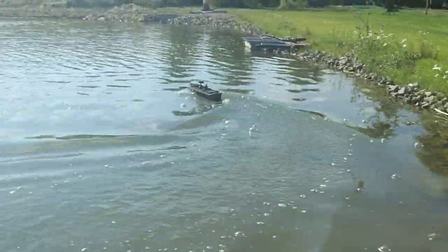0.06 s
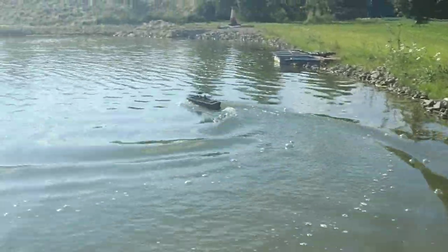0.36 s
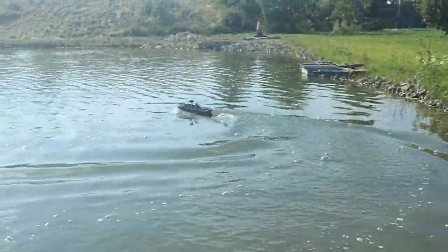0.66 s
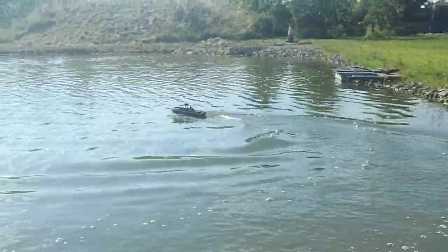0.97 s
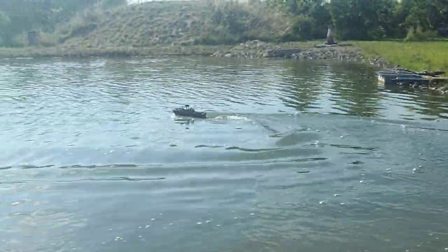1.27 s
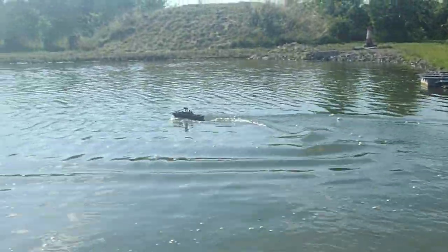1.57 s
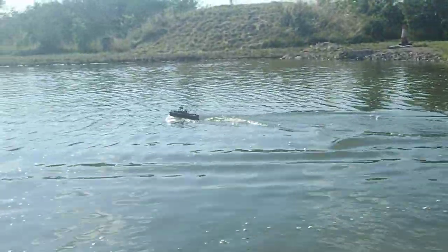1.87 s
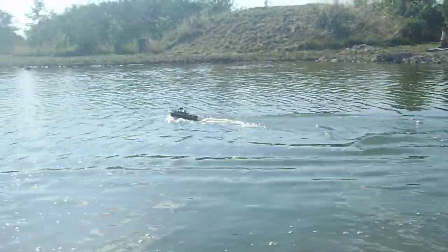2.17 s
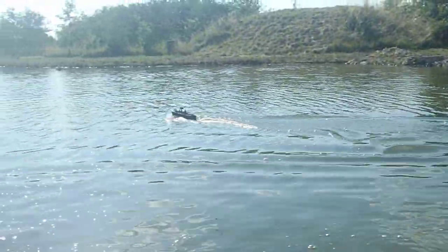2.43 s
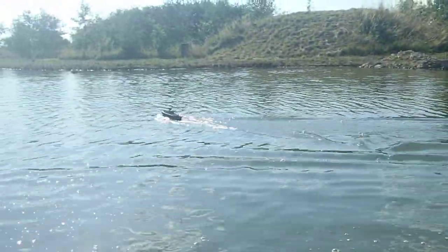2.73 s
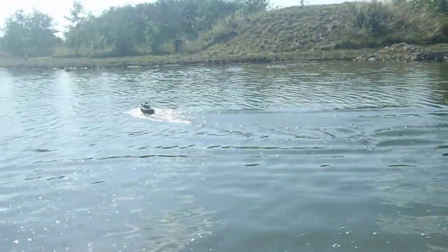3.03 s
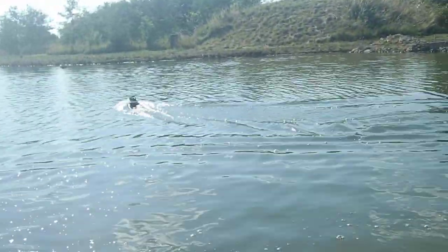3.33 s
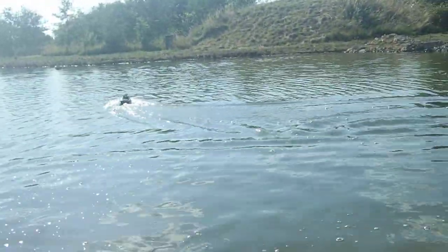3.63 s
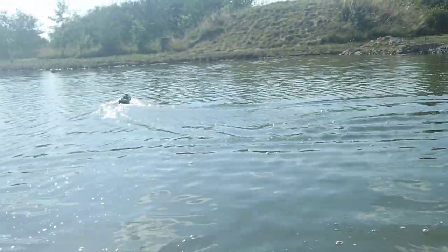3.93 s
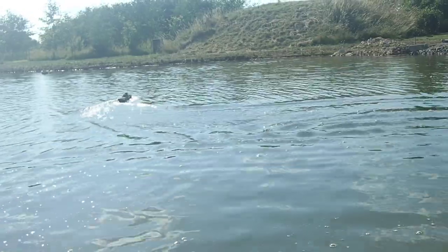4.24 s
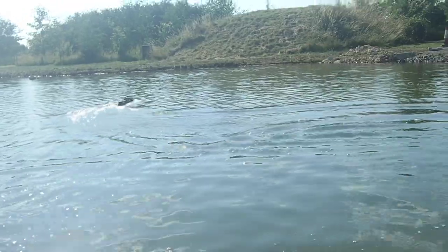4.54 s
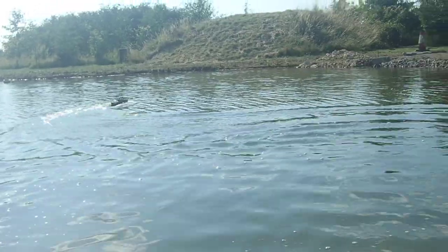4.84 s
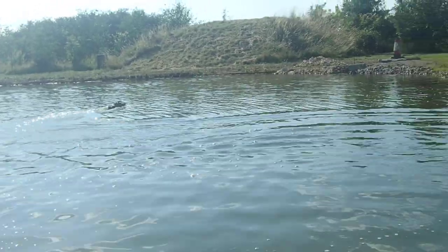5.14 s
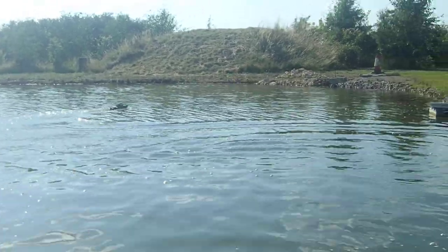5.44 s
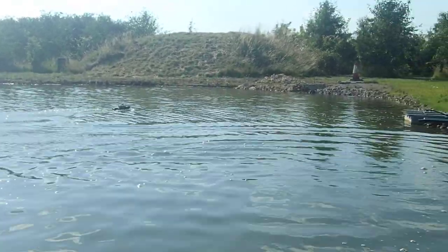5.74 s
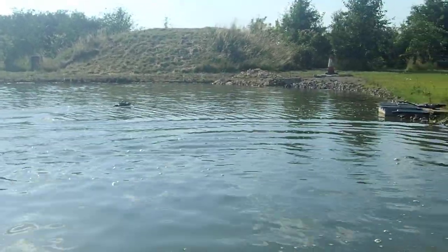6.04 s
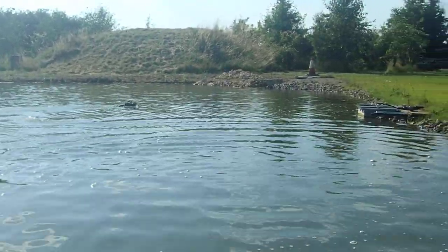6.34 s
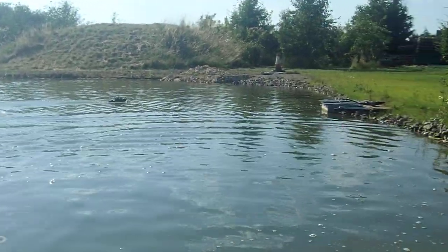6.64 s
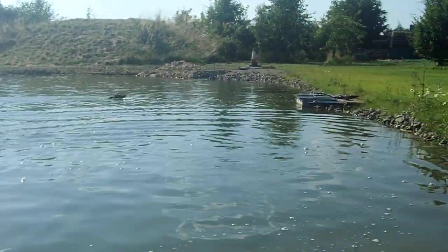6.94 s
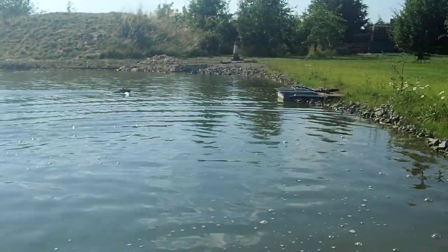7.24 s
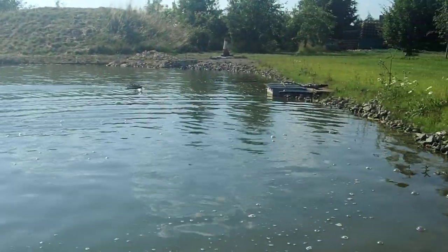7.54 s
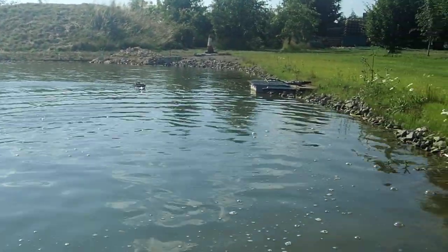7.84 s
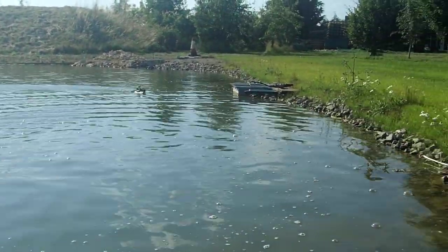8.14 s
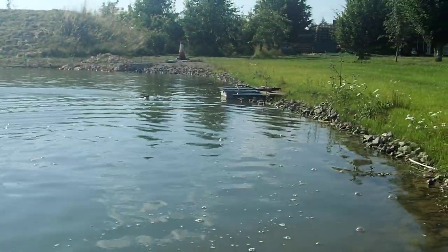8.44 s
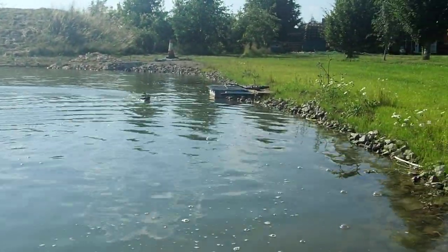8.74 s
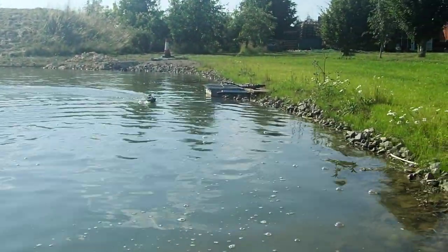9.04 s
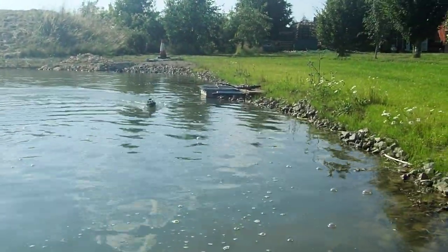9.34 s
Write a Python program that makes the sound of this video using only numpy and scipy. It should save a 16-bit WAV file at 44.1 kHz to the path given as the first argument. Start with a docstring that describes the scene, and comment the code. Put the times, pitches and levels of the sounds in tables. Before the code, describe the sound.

A small electric model boat whines faintly under sizzling spray and gurgling water, while a small bird trills and whistles.

```python
"""A small electric model boat circles on a pond. From the start, over a low outdoor rumble, its motor
whines faintly, bubbles gurgle and spray crackles a little to the right; the camera's microphone ports
ring near 5 kHz and make the spray sizzle. Drops tick and big bubbles plop, with a soft bump at 0.8 s.
A brief high hiss comes just before 2 s, then the first slaps of water. From 5 s a small bird sings a
rising trill and two thin whistles, ending at 8 s while the water splashes on."""
import sys
import numpy as np
from scipy import signal
from scipy.fft import rfft, irfft
from scipy.io import wavfile

SR = 44100
rng = np.random.default_rng(int(sys.argv[2]) if len(sys.argv) > 2 else 0)


def output_pcm(signal):
    """Save a mono or channel-first signal as 16-bit PCM at the path in sys.argv[1].

    Samples are clipped to [-1, 1] before scaling.
    """
    pcm = np.clip(np.atleast_2d(signal).T, -1, 1) * 32767
    wavfile.write(sys.argv[1], SR, np.round(pcm).astype(np.int16))


N = 418940
TIME, BINS = np.arange(N) / SR, np.fft.rfftfreq(N, 1 / SR)


def gain_of(db):
    """Turns decibels into a number to multiply a sound by."""
    return 10 ** (np.asarray(db) / 20)


def evened(x):
    """Scales a signal to an average strength (rms) of 1."""
    return x / np.sqrt(np.mean(x ** 2) + 1e-20)


def spectrum(points):
    """Joins a table's points into a value for every frequency."""
    hz, value = np.transpose(points)
    return np.interp(np.log(BINS + 1), np.log(hz + 1), value)


def follow(rows):
    """Joins a table's points into curves over time, one for each column after the time."""
    times, *columns = np.transpose(rows)
    return [np.interp(TIME, times, column) for column in columns]


def add(mix, start_s, sound):
    """Mixes a sound in at the given time."""
    part = mix[max(round(start_s * SR), 0):][:len(sound)]
    part += sound[:len(part)]


def drift(hz):
    """A smooth random wobble, up to about this fast."""
    return evened(irfft(rfft(rng.standard_normal(N)) / (1 + (BINS / hz) ** 4), N))


def coloured(x, db):
    """Turns each frequency up or down; any ringing comes after a sound, never before it."""
    cepstrum = irfft(np.log(gain_of(db)), N)
    cepstrum[1:N // 2] *= 2
    cepstrum[N // 2 + 1:] = 0
    return irfft(rfft(x) * np.exp(rfft(cepstrum, N)), N)


# how alike the two ports hear the water: (frequency [Hz], likeness [0-1])
PORT_LIKENESS = [(100, 0.45), (900, 0.97), (3400, 1), (4000, 0.8), (5400, 0.99), (6700, 1), (8000, 0.87),
                 (15000, 0.94)]
# which side is louder: (frequency [Hz], left minus right [dB])
PORT_LOUDER_SIDE = [(1000, 1.5), (3300, -1), (4000, -3.5), (4700, -3.5), (5300, -6), (6800, -8.5),
                    (8000, -3.5), (10000, -2), (12500, 1), (15000, 3)]
# how far the left wave runs ahead: (frequency [Hz], lead [radians])
PORT_LEFT_LEAD = [(1000, .03), (3400, 0.023), (4200, 0.17), (5200, 0.73), (6200, 1.23), (7100, 2.1),
                  (10000, 3.1), (14000, 2.7)]
def ports(direct, scattered):
    """Water sound reaches the microphone's two openings, its ports, unequally and only partly alike."""
    direct, scattered = rfft(direct), rfft(scattered)
    same = np.clip(spectrum(PORT_LIKENESS), 0, 1)
    lean = gain_of(spectrum(PORT_LOUDER_SIDE) / 2) * np.exp(.5j * spectrum(PORT_LEFT_LEAD))
    left = same * direct + np.sqrt(1 - same ** 2) * scattered
    return irfft(np.array([left * lean, direct / lean]), N)


# the tone of the open air: (frequency [Hz], relative level [dB])
AIR_TONE = [(10, -11), (25, -3), (55, -1.5), (130, 2.5), (300, 3), (700, 3), (2000, -18), (6000, 2),
            (10000, -8.5), (15500, -11)]
def air(level_db=-53.5, shared=0.45):
    """A steady outdoor rumble and hiss, partly the same on both sides."""
    noise = rng.standard_normal((2, N)) + shared * rng.standard_normal(N)
    return gain_of(level_db) * evened(coloured(noise, spectrum(AIR_TONE)))


def fuzzy_tone(hz, width_hz):
    """A narrow band of noise that follows a pitch."""
    phase = 2 * np.pi * np.cumsum(hz) / SR
    return evened(drift(width_hz) * np.cos(phase) + drift(width_hz) * np.sin(phase))


# the motor's whine: (time [s], pitch [Hz], relative level [dB])
MOTOR_WHINE = [(0, 957, -53), (.7, 962, -53), (1.4, 947, -65), (2.4, 931, -56), (4.1, 915, -57),
               (5.2, 936, -77), (7.5, 922.7, -62), (9.5, 923, -61)]
def motor(whine_db=-5, hum_db=-13, hum_ratio=.64):
    """The electric motor gives a rough whine with a weaker hum below it."""
    hz, db = follow(MOTOR_WHINE)
    whine = gain_of(whine_db) * fuzzy_tone(hz, width_hz=34)
    hum = gain_of(hum_db) * fuzzy_tone(hum_ratio * hz, width_hz=19)
    return gain_of(db) * (whine + hum)


# a hollow band of noise: (time [s], middle pitch [Hz], relative level [dB])
HOLLOW_BAND = [(0, 1604, -64), (2.1, 1552, -58), (2.7, 1412, -56.5), (3.3, 1337, -58), (4.5, 1372, -59),
               (5.6, 1502, -55.5), (7, 1657, -59), (8, 1543, -75), (9.5, 1350, -55)]
def hollow_band(level_db=-1):
    """A faint, hollow band of noise drifts between about 1.3 and 1.7 kHz."""
    hz, db = follow(HOLLOW_BAND)
    return gain_of(level_db + db) * fuzzy_tone(hz, width_hz=73)


# the tone of water landing on water: (frequency [Hz], relative level [dB])
SPLASH_TONE = [(200, -28), (700, -9.5), (1500, -2.5), (2200, 0), (3200, 2), (4500, 2.5), (6500, 7.5),
               (8000, 2), (9200, 0.5), (11000, -6), (15500, -14.5)]
def patter(per_s, spread_db, fizz_db, clump_db, clump_hz):
    """Droplets of all sizes fall in clumps over a fine fizz."""
    sizes = gain_of(spread_db * np.minimum(rng.exponential(1, N), 4))
    landing = rng.random(N) < per_s / SR
    droplets = evened(sizes * landing * rng.choice([-1., 1.], (2, N)))
    fizz = gain_of(fizz_db) * evened(rng.standard_normal((2, N)))
    clumped = (droplets + fizz) * gain_of(clump_db * drift(clump_hz))
    return evened(coloured(ports(*clumped), spectrum(SPLASH_TONE)))


# fine spray over one lap, loudest and brightest as the boat heads away:
# (time [s], relative level [dB], brightness [dB])
SPRAY_LAP = [(0, -45, -10.5), (1.2, -45.5, -6.5), (2.6, -44.7, -3), (4.1, -46, -3), (5.5, -46, -5.5),
             (7, -45.5, -9.5), (9.5, -47, -9)]
def spray(surge_db, churn_db, tapping_db=-44, treble_db=-1):
    """Coarse drops tap and fine ones sizzle; the treble brightens as the camera turns to the spray."""
    loud_db, bright_db = follow(SPRAY_LAP)
    coarse_share = 1 / (1 + (BINS / 4200) ** 10)  # coarse drops carry the lower frequencies
    coarse = patter(per_s=800, spread_db=4.2, fizz_db=0.5, clump_db=1.9, clump_hz=60)
    coarse = irfft(rfft(coarse) * np.sqrt(coarse_share), N)
    fine = patter(per_s=1800, spread_db=4.0, fizz_db=-1, clump_db=1.97, clump_hz=109)
    fine = irfft(rfft(fine) * np.sqrt(1 - coarse_share), N)
    treble = irfft(rfft(fine) / (1 + (6500 / (BINS + 1)) ** 12), N)
    treble_gain = gain_of(treble_db + bright_db - bright_db.mean())
    tapping = gain_of(tapping_db + 0.85 * churn_db) * coarse
    sizzle = gain_of(loud_db + surge_db) * (fine + (treble_gain - 1) * treble)
    return tapping + sizzle


def bubble(hz, life_s, rise_octaves):
    """A pocket of air rings, rising in pitch as it nears the surface."""
    age = np.arange(int(2 * life_s * SR) + 2) / (life_s * SR)
    phase = 2 * np.pi * np.cumsum(hz * (1 + (2 ** rise_octaves - 1) * age)) / SR
    swell = age * np.exp(-age / 0.25)
    return swell / swell.max() * np.sin(phase)


# the tone of churned water: (frequency [Hz], relative level [dB])
WASH_TONE = [(100, -27.5), (350, -15), (700, -6), (1000, -0.5), (1600, 2), (2400, -5), (4000, -17.5),
             (8000, -15)]
def gurgle(churn_db, count=4200, bubbles_db=-52, wash_db=-53, patchy_db=2, softer_db_per_octave=7.5):
    """Many small, short-lived bubbles ring over the rush of churned water."""
    bubbles = np.zeros(N)
    for when, pitch_pick, ring, rise, luck in rng.random((count, 5)):
        hz = np.interp(pitch_pick, [0, .1, .3, .65, .9, 1], [260, 520, 820, 1400, 1900, 3000])
        db = 3.2 * min(-np.log(luck + 1e-9), 3)  # a few are much louder
        db -= softer_db_per_octave * max(np.log2(1000 / hz), 0)  # low ones are softer
        life_s = (5 + 18 * ring ** 2) / hz
        add(bubbles, when * N / SR, gain_of(db) * bubble(hz, life_s, 0.835 * rise))
    wash = evened(coloured(rng.standard_normal((2, N)), spectrum(WASH_TONE)))
    wash *= gain_of(wash_db + patchy_db * drift(28))
    water = gain_of(bubbles_db) * evened(bubbles) + wash[0]
    return ports(water, wash[1]) * gain_of(churn_db)


# single sharp drops: (time [s], relative level [dB])
SHARP_DROPS = [(0.449, -25), (0.7217, -26), (2.123, -22.5), (2.132, -27), (2.781, -26), (3.8073, -28),
               (4.4, -23), (4.7965, -23), (5.0102, -24.5), (5.0714, -21.5), (5.7193, -23), (6.7594, -27),
               (7.2676, -25.5), (7.792, -24.5), (7.909, -25), (9.116, -23.5)]
def drops(level_db=-6.5, tick_hz=5500, fade_s=.0003):
    """Each drop ticks as it lands, and twice more as it breaks up."""
    ticks, t = np.zeros(N), TIME[:800]
    tick = np.cos(2 * np.pi * tick_hz * t) * np.exp(-t / fade_s)
    for start_s, db in SHARP_DROPS:
        for delay_s, share in [(0, 1), (rng.uniform(.001, .002), .45), (rng.uniform(.003, .005), .3)]:
            add(ticks, start_s + delay_s, share * gain_of(level_db + db) * tick)
    return coloured(ticks, spectrum(SPLASH_TONE))


# single big bubbles: (time [s], relative level [dB], starting pitch [Hz])
BIG_BUBBLES = [(.758, -31.5, 1750), (1.096, -41.5, 474), (1.182, -36.5, 787), (1.312, -32.5, 1496),
               (2.09, -40, 344), (2.102, -40, 770), (2.152, -29, 1400), (2.154, -35, 2050),
               (2.169, -27, 1445), (2.473, -34, 1344), (2.91, -34, 1430), (3.304, -35, 1350),
               (3.323, -35, 1280), (5.102, -35, 1600), (7.055, -34.5, 1640), (7.315, -39.5, 588),
               (8.13, -45, 443), (8.339, -36.5, 1466), (8.865, -36.5, 1290), (8.885, -44, 450),
               (8.98, -38.5, 790)]
def plops(level_db=-2):
    """Big bubbles plop; the larger, lower ones ring longer and rise further in pitch."""
    sound = np.zeros(N)
    for start_s, db, hz in BIG_BUBBLES:
        size = 1000 / hz  # 1 for a bubble that rings at 1 kHz
        plop = bubble(hz, life_s=0.0123 * size ** .6, rise_octaves=0.353 * size ** 1.12)
        add(sound, start_s, gain_of(level_db + db) * plop)
    return sound


def bump(start_s=.815, level_db=-53):
    """A soft bump on the camera: one low note that dies away fast."""
    sound = np.zeros(N)
    add(sound, start_s, gain_of(level_db) * bubble(hz=105, life_s=0.029, rise_octaves=0))
    return sound


# the hull meets a ripple: (time [s], change in spray [dB], change in churn [dB])
RIPPLES = [(1.32, 0, 2), (2.44, 0, 1), (2.91, -2, 3), (3.9, 0.5, 1), (4.39, 2, 0), (5.04, 1.5, 0.5),
           (5.22, -1, 1.5), (5.62, 2, 2), (6.2, 0, 1), (6.77, 1, 1.5), (7.34, 0, 1), (7.82, 0.5, 0.5),
           (8.88, -1, 0)]
def surges(rise_s=0.065, fall_s=0.061):
    """Brief swells in the churning, with the spray rising, holding or dipping; gives both in decibels."""
    change_db = np.zeros((2, N))
    for peak_s, spray_db, churn_db in RIPPLES:
        width_s = np.where(TIME < peak_s, rise_s, fall_s)
        change_db += np.outer([spray_db, churn_db], np.exp(-((TIME - peak_s) / width_s) ** 2))
    return change_db


# how the hiss comes and goes: (time [s], level [dB])
HISS_SWELL = [(1.72, -85), (1.75, -52), (1.782, -46), (1.81, -53), (1.85, -55), (1.92, -78)]
# its tone: (frequency [Hz], relative level [dB])
HISS_TONE = [(3000, -18), (7000, -5), (10000, 0), (15000, -1), (16000, -12)]
def hiss():
    """One brief, high hiss swells and fades."""
    noise = evened(coloured(rng.standard_normal((2, N)), spectrum(HISS_TONE)))
    return noise * gain_of(follow(HISS_SWELL)[0])


# broad slaps of water: (time [s], relative level [dB])
WATER_SLAPS = [(1.92, -24), (2.1535, -26), (2.4329, -26), (2.4567, -26.5), (3.2194, -29), (3.8866, -30),
               (4.8314, -26), (7.7682, -24), (7.86, -26), (8.1663, -26), (8.7201, -27.5)]
def slaps(level_db=-4, fade_s=0.008, cutoff_hz=3300):
    """Each slap of water is a short burst of noise, duller than a drop."""
    bursts, t = np.zeros(N), TIME[:800]
    for start_s, db in WATER_SLAPS:
        add(bursts, start_s, gain_of(level_db + db) * rng.standard_normal(len(t)) * np.exp(-t / fade_s))
    dulled = signal.sosfilt(signal.butter(2, cutoff_hz, fs=SR, output="sos"), bursts)
    return coloured(dulled, spectrum(SPLASH_TONE))


# the trill grows louder and climbs: (time [s], relative level [dB], middle pitch [Hz])
BIRD_TRILL = [(4.96, -34, 5090), (5.17, -33, 5050), (5.39, -26, 5066), (5.82, -23.7, 5357),
              (6.04, -21, 5380), (6.27, -24, 5445), (6.39, -23, 5410)]
def trill(waver, level_db=-13, first_s=4.958, spacing_s=.1077, count=14):
    """The bird sings a quick row of notes, each swelling while it slides down in pitch."""
    progress = np.linspace(0, 1, count)
    starts = first_s + spacing_s * np.arange(count) + .036 * progress ** 11  # the last notes come late
    lengths = np.linspace(0.0591, 0.073, count)
    times, *columns = np.transpose(BIRD_TRILL)
    levels, pitches = (np.interp(starts, times, column) for column in columns)
    falls = 283 + 11 * (levels - levels.max())  # softer notes slide less
    falls *= 1 + .2 * rng.uniform(-1, 1, count)
    song = np.zeros(N)
    for start_s, length_s, db, hz, fall_hz in zip(starts, lengths, levels, pitches, falls):
        age = np.linspace(0, 1, int(length_s * SR))
        pitch = hz - fall_hz * (age - .5) + waver[int(start_s * SR):][:len(age)]
        swell = np.interp(age, [0, .3, .78, .88, 1], [0.21, 0.66, 0.85, 0.28, 0.054])
        add(song, start_s, gain_of(level_db + db) * swell * np.sin(2 * np.pi * np.cumsum(pitch) / SR))
    return song


# the closing whistles, one list each: (time [s], pitch [Hz], level [dB])
BIRD_WHISTLES = [
    [(6.54, 4720, -70), (6.6, 4640, -53), (6.7, 4605, -57), (6.78, 4595, -54), (6.92, 4580, -59),
     (7.03, 4590, -60), (7.11, 4605, -55), (7.22, 4590, -70)],
    [(7.45, 7450, -65), (7.6, 6720, -51), (7.72, 6130, -57), (7.86, 5650, -61), (8, 5200, -71)],
]
def whistles(waver):
    """The bird ends with two thin, pure tones, one held and one falling."""
    song = np.zeros(N)
    for rows in BIRD_WHISTLES:
        hz, db = follow(rows)
        singing = (TIME > rows[0][0]) & (TIME < rows[-1][0])
        song += singing * gain_of(db) * np.sin(2 * np.pi * np.cumsum(hz + .5 * waver) / SR)
    return song


def bird(waver_hz=29, echo_db=-23, echo_s=0.44, right_delay_s=.000023):
    """The wavering song reaches the left side first, and the pond's banks echo it faintly."""
    waver = waver_hz * drift(145)
    song = trill(waver) + whistles(waver)
    tail = rng.standard_normal((2, SR // 2)) * gain_of(-60 * TIME[:SR // 2] / echo_s)
    echo = signal.fftconvolve(song[None], tail / np.linalg.norm(tail[0]), axes=1)[:, :N]
    right = irfft(rfft(song) * np.exp(-2j * np.pi * BINS * right_delay_s), N)
    return np.array([song, right]) + gain_of(echo_db) * echo


def scene():
    """The boat, the water, the bird and the open air, all added together."""
    surge_db, churn_db = surges()
    boat = spray(surge_db, churn_db) + gurgle(churn_db) + motor()
    hollow = hollow_band()
    splashes = ports(drops() + plops() + slaps(), scattered=np.zeros(N))
    return boat + hollow + splashes + bird() + air() + bump() + hiss()


# where the microphone's case rings or muffles: (frequency [Hz], half width [Hz], boost or cut [dB])
MICROPHONE_CASE = [(1875, 68, -7.5), (2180, 160, 3), (2710, 210, -0.5), (3080, 280, 4.5), (3420, 133, -4.5),
                   (3580, 100, 1.5), (4064, 270, -8.5), (4826, 83, -14), (5257, 1057, 14), (7955, 800, 8)]
def record(dry, cutoff_hz=15750):
    """The microphone's case colours every sound, then the very highest treble is cut off."""
    case_db = sum(db * np.exp(-((BINS - hz) / width) ** 2) for hz, width, db in MICROPHONE_CASE)
    low_pass = signal.firwin(1023, cutoff_hz, window=("kaiser", 9), fs=SR)
    return signal.oaconvolve(coloured(dry, case_db), low_pass[None], "same")


dry = scene()
out = record(dry)
output_pcm(out)
```